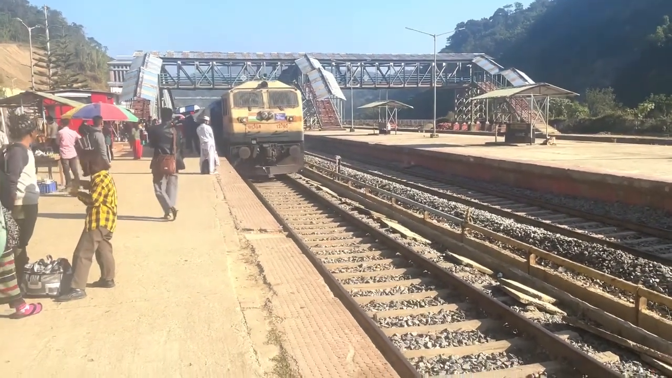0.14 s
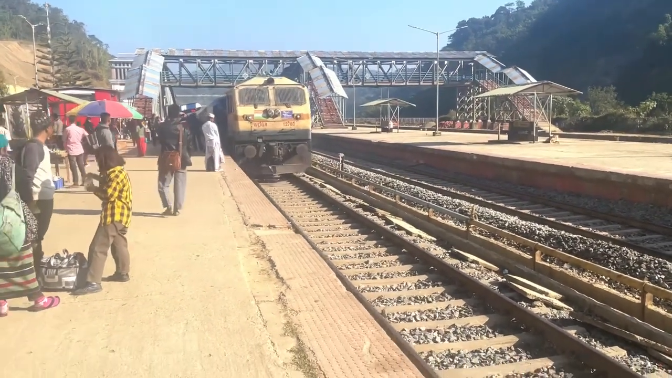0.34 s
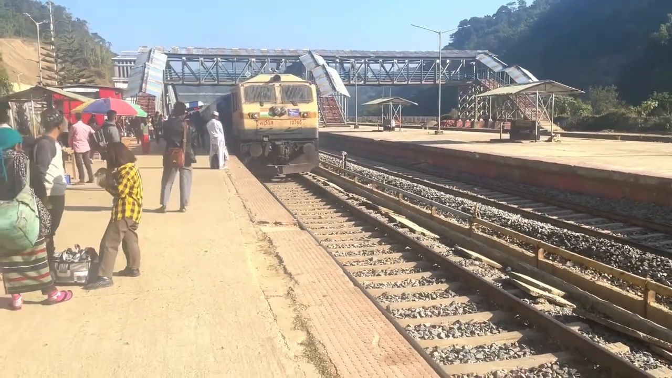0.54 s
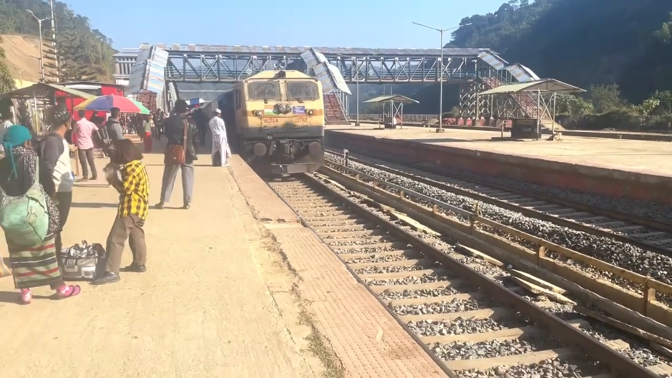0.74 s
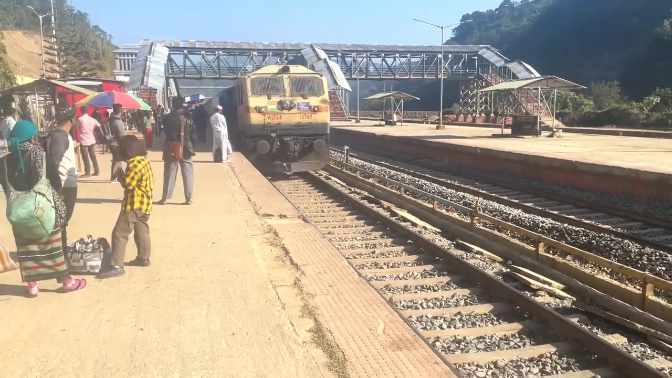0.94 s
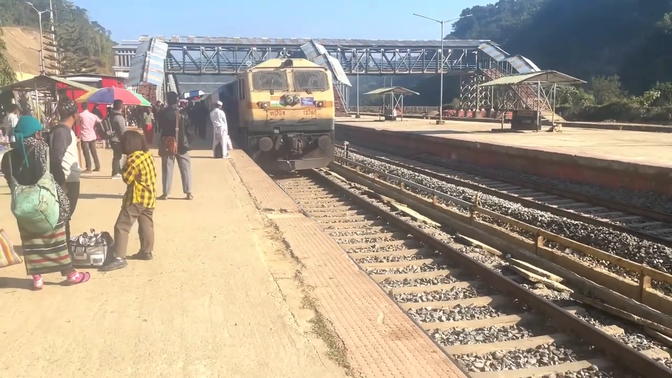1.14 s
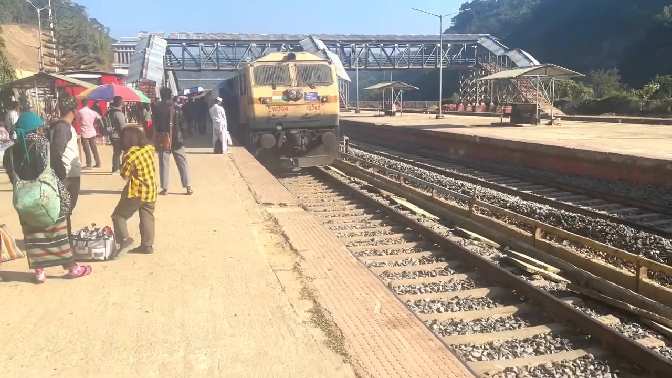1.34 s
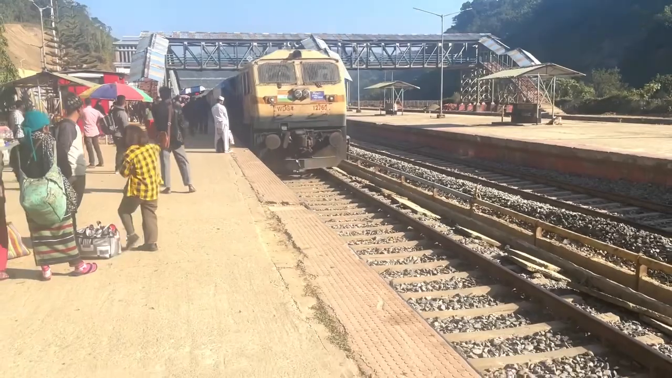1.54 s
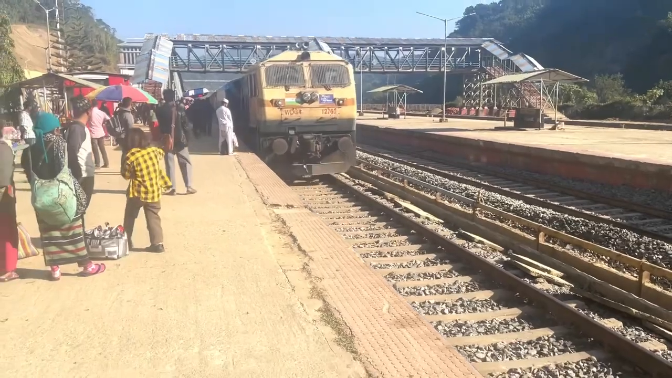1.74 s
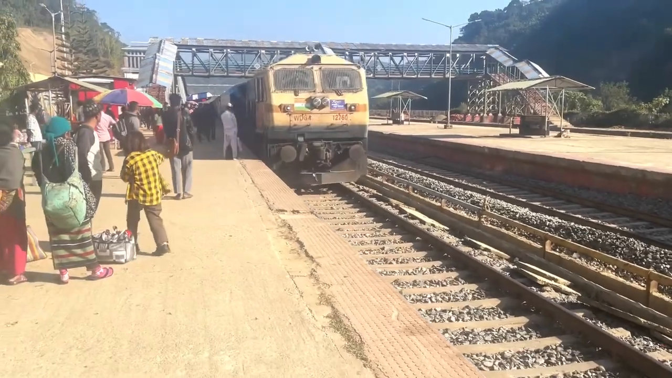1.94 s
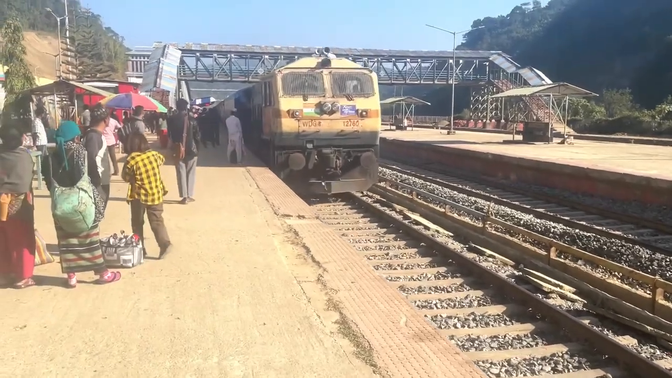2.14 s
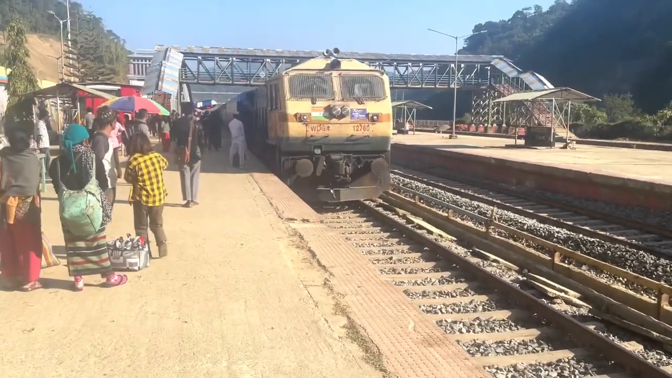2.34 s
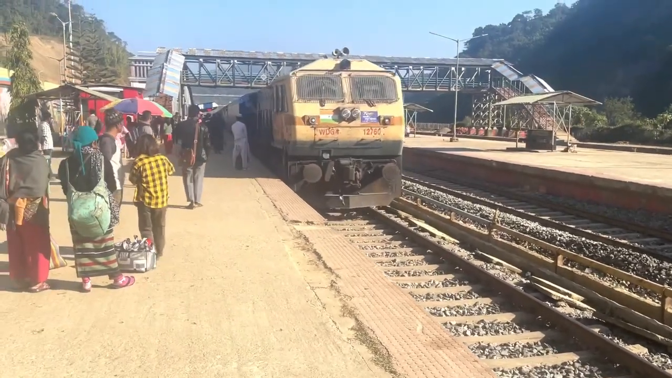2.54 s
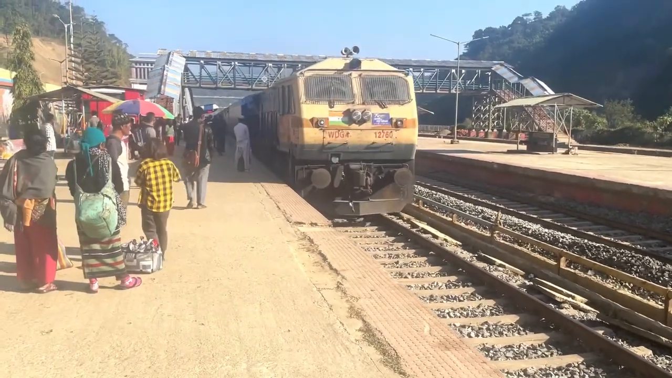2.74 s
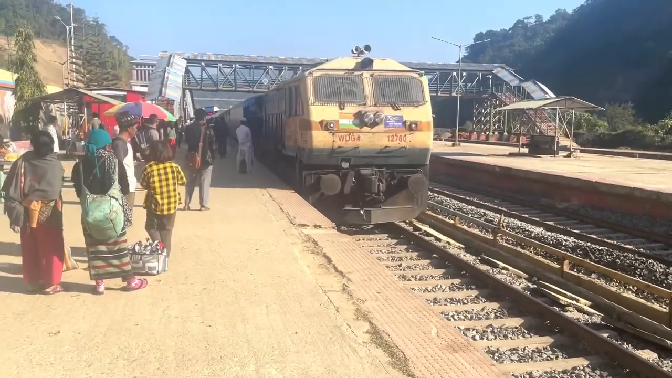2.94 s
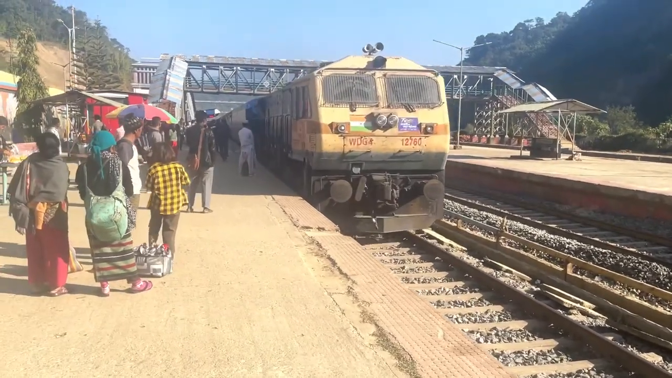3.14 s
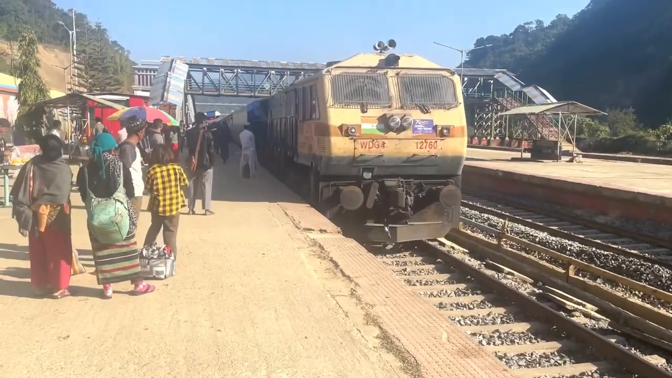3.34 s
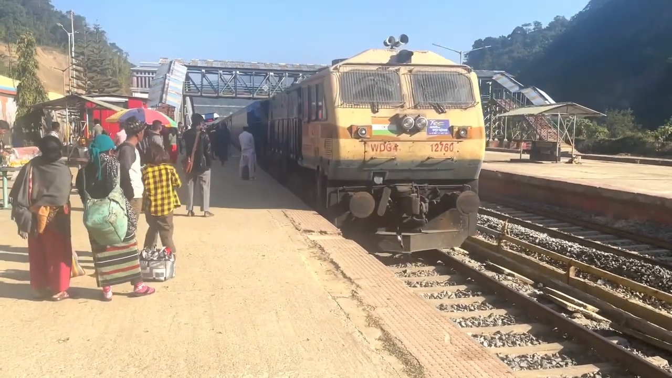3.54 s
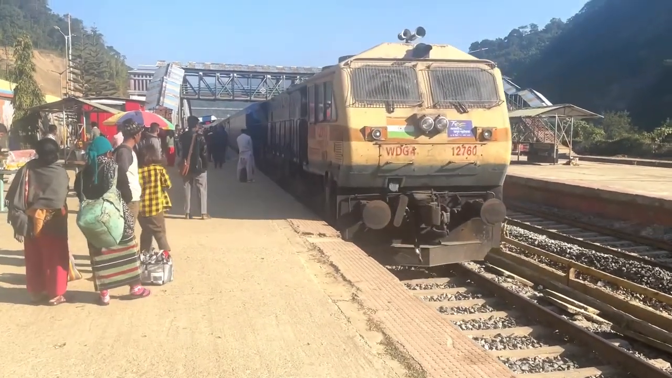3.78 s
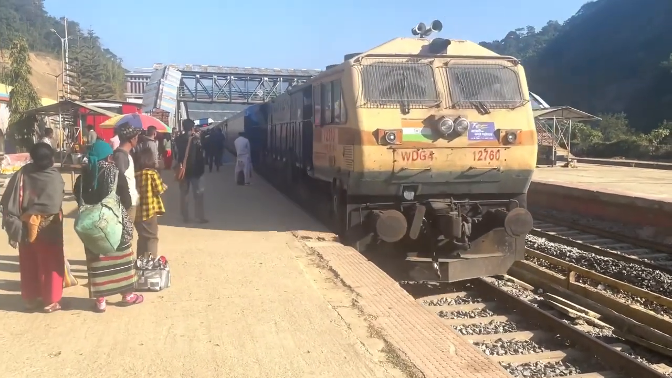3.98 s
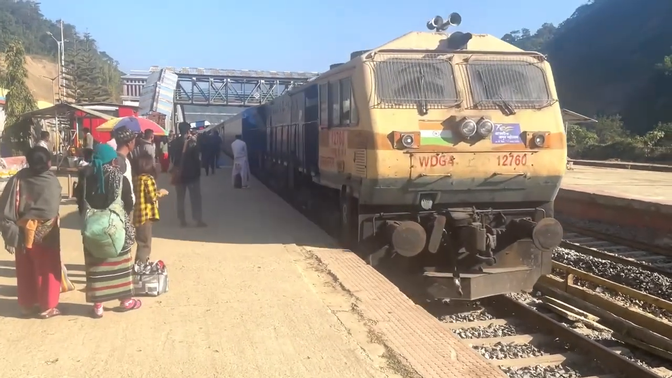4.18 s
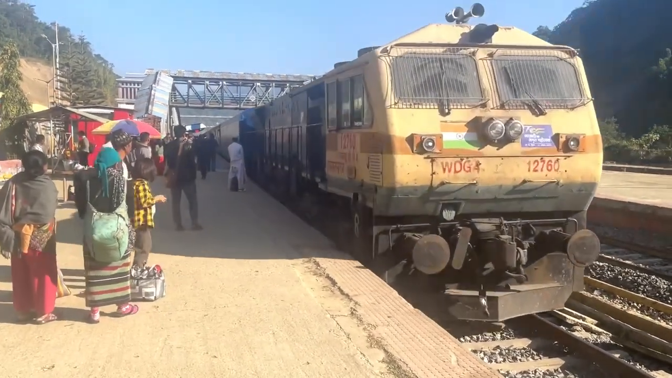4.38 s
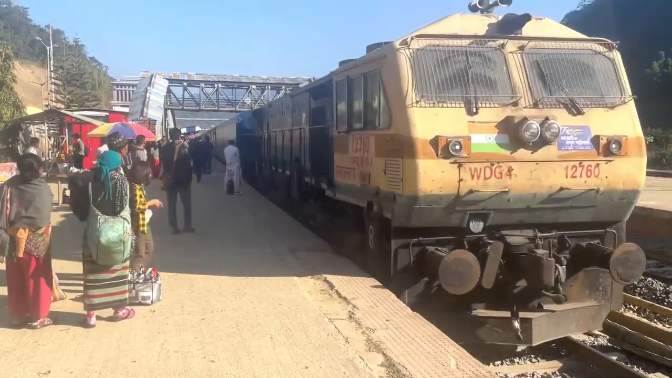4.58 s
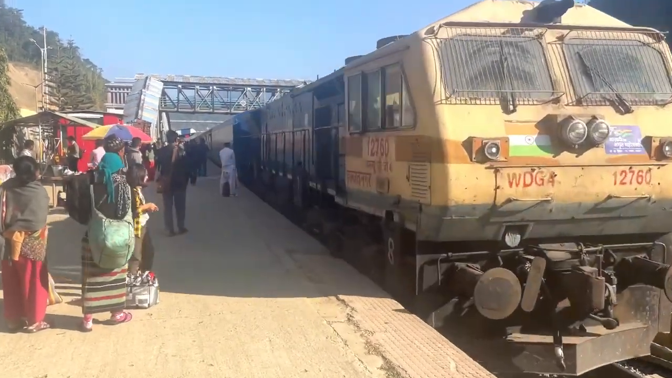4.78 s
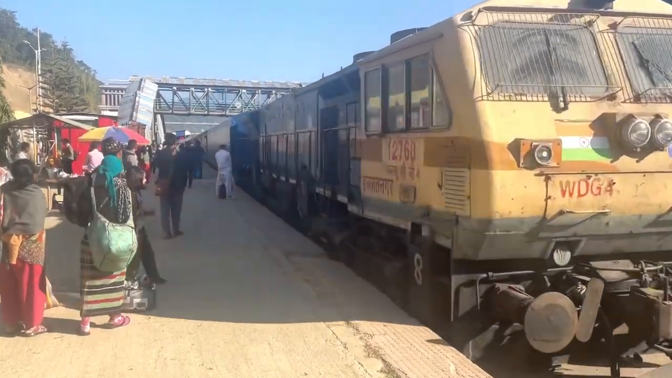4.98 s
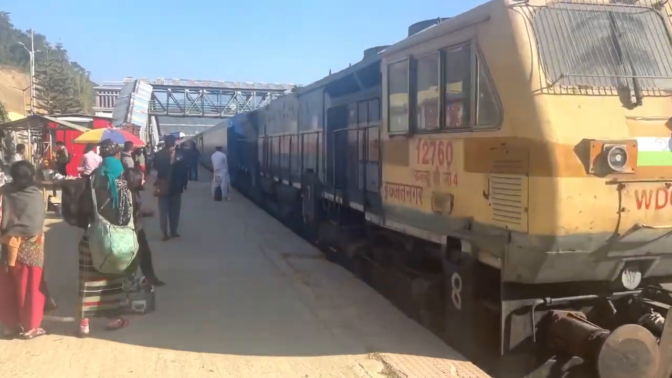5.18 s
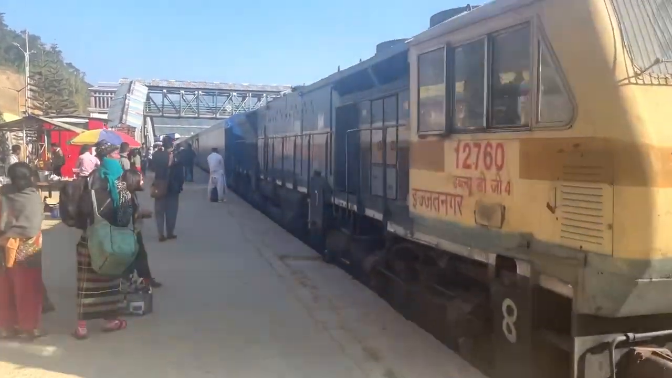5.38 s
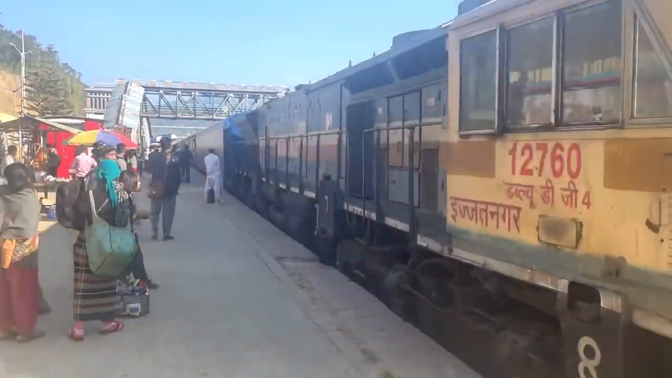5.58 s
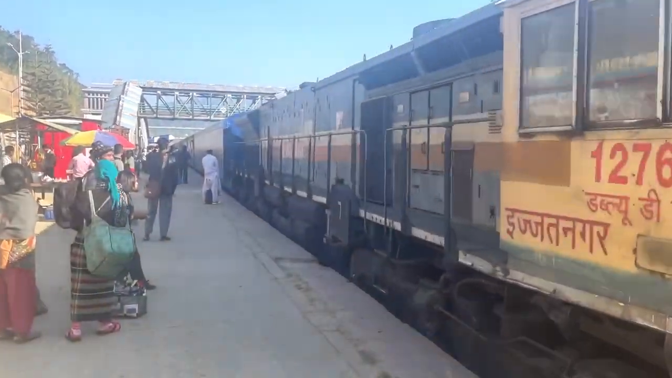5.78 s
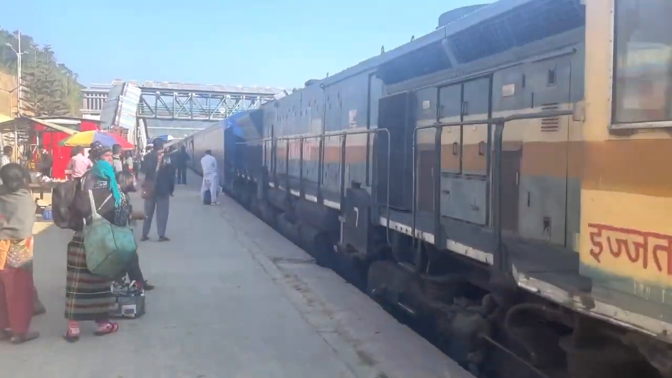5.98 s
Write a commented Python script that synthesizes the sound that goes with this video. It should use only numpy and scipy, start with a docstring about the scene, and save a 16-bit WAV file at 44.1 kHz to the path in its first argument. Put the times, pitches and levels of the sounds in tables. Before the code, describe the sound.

A diesel locomotive rolls toward a listener on an open station platform. Its engine throbs low and steady while a rough roar of fans and wheels grows gradually louder. A thin, high turbine whine flickers above it, joined by a faint squeal. About two thirds through, a wheel gives one soft, dull knock with a tiny puff of air. The engine is loudest at the end, as it draws almost level.

```python
"""Diesel locomotive along a platform

A phone on the platform, 5 m from the track, hears a sixteen-cylinder two-stroke roll up from some 30 m.
Exhaust orders of the crankshaft throb in the bass; gears, blower and turbine whine in thin lines that
fade in the moving air. Fans, wheels and ballast roar louder as it nears; a wheel knocks, brake air puffs."""
import sys
import numpy as np
from scipy import signal
from scipy.fft import rfft, irfft
from scipy.io import wavfile
from scipy.ndimage import uniform_filter1d, map_coordinates

SR = 44100
rng = np.random.default_rng(int(sys.argv[2]) if len(sys.argv) > 2 else 0)


def wav_out(sig):
    """Save sig, one row per channel (or a flat mono array), as 16-bit PCM at SR to the path in sys.argv[1]."""
    wavfile.write(sys.argv[1], SR, np.round(np.clip(np.atleast_2d(sig).T, -1, 1) * 32767).astype(np.int16))


N = 265041
T = np.arange(N) / SR
CRANK_HZ = 6.083
FIRING_HZ = 8 * CRANK_HZ  # one bank of eight cylinders


def exhaust():
    """Orders of the crank turn beat against each other; each main one sinks where an echo cancels it."""
    # main tones (crank order, index of the part that sounds it)
    main_orders = ((8, 0), (9, 0), (11, 2), (13, 1), (15, 1), (16, 2), (17, 1))
    # starting crank angle of each part (first manifold [deg], second manifold [deg], outlet [deg])
    stack_deg = (16., 241., 0.)
    # per main tone (base level [dB], drift [dB/s], dip time [s], half width [s], depth [dB])
    echo_dips = [(-16, 0.76, 5.12, 0.7, -30), (-23, -0.85, 4.8, 0.69, -17), (-43.5, 1.5, 1.3, 1.9, -14.5),
                 (-36, 2.5, 1.1, 1.7, -17), (-19.5, 1.5, 3.3, 0.48, -3), (-24.5, 0.93, 2.65, 1.3, -13),
                 (-20, 1.09, 2.45, 1.03, -9.5)]
    # per main tone (phase gained through its dip [deg])
    echo_turn_deg = (145, 130, 0, 90, 0, 0, 0)
    # brief swells and sags, by order (time [s], half width [s], gain [dB])
    bulges = {13: (2.8, 0.31, 3.2), 15: (1.36, 0.3, 2), 16: (4.1, .3, 2.8), 17: (5.3, 0.47, -1.8)}
    # weak tones of block and manifold (crank order, base level [dB])
    weak_orders = [(7, -38.5), (10, -36), (12, -35), (18, -41.5), (21, -40.5), (23, -41.5), (24, -35),
                   (30, -37), (32, -39), (35, -38), (40, -43), (42, -47)]
    flat_hz, drift_ends_s = .11, 4.86
    # the governor lets the crank run ahead and fall back
    hunt = np.radians(2.3) * (.4 + np.sin(2 * np.pi * (T - 2.2) / 4.8))
    crank = 2 * np.pi * CRANK_HZ * T + hunt
    out = 0
    for (k, stack), (db, drift, s, width, depth_db), turn in zip(main_orders, echo_dips, echo_turn_deg):
        passed = .5 + np.arctan((T - s) / (width * undb(depth_db))) / np.pi
        phase = k * (crank + np.radians(stack_deg[stack])) - 2 * np.pi * flat_hz * T
        phase += np.radians(turn) * passed
        level_db = db + drift * np.minimum(T, drift_ends_s) + echo_dip_db(s, width, depth_db)
        if k > 10:
            level_db -= 1.5 * np.maximum(T - drift_ends_s, 0)
        at, half, bulge_db = bulges.get(k, (0, 1, 0))
        level_db += bulge_db * np.exp(-((T - at) / half) ** 2)
        out += tone(phase, level_db, lead=.05, spread=.004 * (k - 5), flutter_db=.3, pan_db=.9, fading=0)
    for k, db in weak_orders:
        level_db = db + .22 * nearness_db() - .74 + 1.7 * walk(1.1)
        phase = k * crank + 2 * np.pi * rng.random() + .71 * walk(1.61)
        out += tone(phase, level_db, lead=.099, spread=.085, flutter_db=.5, pan_db=4.5)
    return out


def echo_dip_db(s, width, depth_db):
    """The notch in level that a cancelling echo cuts around time s."""
    away = ((T - s) / width) ** 2
    return 10 * np.log10((away + undb(depth_db) ** 2) / (away + 1))


def roar():
    """Fans, wheels and ballast: noise bands flicker and swell with nearness, the treble most."""
    # spectrum common to both microphones (frequency [Hz], relative density [dB])
    mid_spectrum = [(20, -4.5), (40, -6.5), (75, 5), (125, 0.5), (250, -3), (700, -7), (900, -13),
                    (1600, -20.5), (2700, -22), (3300, -30.5), (3800, -30), (4900, -29), (5800, -32.5),
                    (7300, -38), (7700, -53.5), (8300, -92.5), (9600, -47.5), (10200, -46.5), (12500, -50),
                    (13500, -69), (14200, -95.5)]
    # spectrum in opposite phase at the two (frequency [Hz], relative density [dB])
    side_spectrum = [(20, -12), (130, -12), (250, -10), (450, -5.5), (720, -4.5), (1100, -9.5), (2700, -13),
                     (4400, -22.5), (6500, -26.5), (9000, -31), (10200, -40.5), (11500, -67),
                     (13500, -42.5), (15000, -42.5), (15800, -68)]
    # casing resonances (frequency [Hz], width [Hz], relative level [dB])
    casing = [(340.4, 17, -12.5), (477.7, 18, -12.5), (581.8, 8, -18), (718, 120, -7.5), (2854, 800, -11.5),
              (3417, 83, -12), (4360, 190, -26.5), (5310, 87, -20), (10660, 350, -35)]
    # extra swell of the top treble (time [s], gain [dB])
    treble = [(0, 1), (.7, 2.5), (1.1, -3.5), (1.6, -2), (2.2, 0), (2.6, 1), (3.0, -1), (3.2, -1.5),
              (3.7, -1), (3.95, 0), (4.5, 1.5), (5.0, 0), (6, -1)]
    # stereo balance (frequency [Hz], left minus right [dB])
    balance = [(50, -7.5), (250, -0.5), (600, 4.5), (1200, 3), (2400, -3), (5000, 4.5), (10000, 0)]
    near_db = nearness_db()
    rumble_db = -33 + .98 * near_db
    tilt_db = .14 * (near_db - np.mean(near_db))
    ahead = np.clip((5 - T) / 2.5, 0, 1)  # falls to 0 as the engine swings aside

    def gain(hz):
        hiss_share = np.clip(np.log2(hz / 700) / .88, 0, 1)
        treble_share = np.clip(np.log2(hz / 1500) / 2.2, 0, 1)
        flicker_db = (.4 + .5 * hiss_share) * walk(15)
        return undb(rumble_db + hiss_share * tilt_db + treble_share * curve(treble) + flicker_db)
    bands = [(hz, undb(1.5) * x) for hz, x in third_octaves(mid_spectrum)]
    bands += [(hz, undb(db + 1.26 * walk(6)) * resonance(hz, width)) for hz, width, db in casing]
    balance_hz, balance_db = np.transpose(balance)
    left = right_low = right_high = 0
    for hz, x in bands:
        x = x * gain(hz)
        lean = undb(np.interp(np.log(hz), np.log(balance_hz), balance_db) / 2)
        left += x * lean
        if hz > 1200:
            right_high += x / lean
        else:
            right_low += x / lean
    # long waves reach the left microphone first while the engine is ahead
    lag_s = .00014 * ahead
    right = right_high + map_coordinates(right_low, [np.arange(N) - lag_s * SR], order=3, mode="mirror")
    side = undb(-15 + 4 * ahead) * sum(x * gain(hz) for hz, x in third_octaves(side_spectrum))
    return np.array([left + side, right - side])


def turbine(hz=3446.5):
    """The turbine's whine grows with nearness, wavers in stirred air and flares now and then."""
    # flares (time [s], peak level [dB], half width [s])
    flares = [(0.042, -35, 0.058), (0.265, -35.5, 0.078), (0.503, -45, .06), (0.72, -37.5, 0.21),
              (1.036, -25, 0.039), (1.2, -32, 0.11), (1.48, -30, 0.051), (1.64, -36.5, 0.043),
              (1.897, -30.5, 0.031), (2.024, -30.5, 0.033), (2.196, -36, 0.052), (2.397, -27, 0.038),
              (2.554, -28.5, 0.028), (2.679, -28.5, 0.02), (2.766, -34, .03), (2.876, -26.5, 0.027),
              (3.076, -33.5, 0.03), (3.184, -30, 0.021), (3.347, -32.5, 0.1), (3.634, -26, 0.054),
              (3.789, -21, 0.015), (3.95, -31, 0.11), (4.116, -29.5, 0.071), (4.328, -22, 0.057),
              (4.496, -22, 0.019), (4.68, -30, 0.21), (4.885, -21, 0.046), (5.05, -22, 0.078),
              (5.227, -26, 0.057), (5.37, -27, 0.06), (5.5, -25, 0.088), (5.737, -23, 0.06),
              (5.846, -20, 0.058), (6.0, -23, 0.015)]
    # weaker lines at 0.5, 1.5 and 2 times the pitch, each (time [s], level [dB])
    partials = [
        [(0, -71), (3.3, -60), (3.8, -52), (4.5, -42), (5, -46), (5.7, -40.5), (6, -51)],
        [(0, -65), (1.35, -66), (1.52, -53), (1.7, -59), (2.1, -52), (2.4, -53.5), (4.2, -54), (4.75, -45.5),
         (4.92, -49), (5.15, -39.5), (5.4, -48), (5.6, -47), (6, -43)],
        [(0, -67.5), (1.1, -68), (3, -66), (4.5, -58.5), (5.1, -57.5), (6, -50)],
    ]
    # lead of the left microphone (time [s], phase [rad])
    lead = ((0, 1.82), (3.8, 1.77), (6, 0.81))
    power = undb(-48.5 + nearness_db() + 4.5 * walk(24)) ** 2
    power += sum(undb(db) ** 2 * np.exp(-((T - s) / half) ** 2) for s, db, half in flares)
    phase = shaft_phase(hz, shake_rad=undb(-14))
    out = tone(phase + .15 * walk(25), 10 * np.log10(power), lead=curve(lead),
               spread=.25, flutter_db=.9, pan_db=1.5, fading=.2)
    for k, levels in zip((.5, 1.5, 2), partials):
        out += tone(k * phase + .9 * walk(40), curve(levels), lead=.4, spread=.6, flutter_db=1.6, fading=.5)
    return out


def gears(hz=2941):
    """The gear whine swells and drops out, right of centre."""
    # swells (time [s], level [dB])
    levels = [(0, -52), (.62, -40), (1.08, -48), (1.3, -35), (1.75, -55), (1.9, -38.5), (2.2, -44.5),
              (2.5, -34.5), (2.6, -50), (2.72, -35), (2.9, -45.5), (3.05, -36), (3.3, -48), (3.68, -31.5),
              (3.86, -37), (4.1, -31), (4.3, -45), (4.52, -29.5), (4.64, -49), (4.83, -38), (5.27, -31.5),
              (5.37, -48), (5.78, -32.5), (6, -41)]
    # lead of the left microphone (time [s], phase [rad])
    lead = ((0, 0.48), (6, 1.1))
    phase = shaft_phase(hz, shake_rad=undb(-10.5)) + .15 * walk(25)
    return tone(phase, curve(levels), lead=curve(lead), spread=.084, flutter_db=.9, pan_db=-5.5, fading=.2)


def shaft_phase(hz, shake_rad):
    """Phase of a fast shaft tone; the firing of each bank shakes sidebands onto it."""
    shake = shake_rad * np.sin(2 * np.pi * FIRING_HZ * T + .5 * walk(7.3))
    return 2 * np.pi * np.cumsum(hz + 1.8 * walk(4)) / SR + shake


def alternator(slot_hz=479.6):
    """The alternator's slots hum at a steady pitch."""
    # 2nd, 3rd and 4th multiples of the slot tone, each (time [s], level [dB])
    hums = [
        [(0.0, -67), (0.08, -46), (0.47, -49.5), (2.62, -38.5), (2.66, -46.5), (3.27, -48), (4.11, -35.5),
         (4.34, -56), (4.46, -37), (5.13, -49), (5.21, -36), (6.0, -39)],
        [(0.0, -53), (0.17, -54), (0.82, -50), (0.84, -64), (1.19, -42.5), (1.27, -56.5), (2.49, -50),
         (3.44, -49.5), (5.56, -43), (5.58, -33.5), (5.98, -30.5), (6.0, -35)],
        [(0.0, -70), (0.22, -46), (0.28, -61), (2.59, -58.5), (2.69, -41), (2.81, -47), (3.66, -58.5),
         (5.9, -41), (6.0, -43.5)],
    ]
    out = 0
    for i, levels in enumerate(hums):
        phase = (i + 2) * 2 * np.pi * slot_hz * T + .86 * walk(12)
        out += tone(phase, curve(levels), spread=.29 + .5 * i, flutter_db=.9, pan_db=1.6, fading=.4)
    return out


def blower_and_squeals(blade_hz=1339.5, squeal_hz=5355.5, faint_hz=5895):
    """The blower's blade tone and two thin squeals, the stronger shaken at the firing rate."""
    # blade tone and stronger squeal, each (time [s], level [dB])
    levels = [
        [(0, -52.5), (1.4, -58), (2.66, -52), (4.3, -49), (4.6, -43.5), (5, -45.5), (5.5, -42.5), (6, -37)],
        [(0, -51), (.55, -53), (1.4, -53.5), (2.0, -52), (2.5, -48.5), (3.0, -39.5), (3.15, -46), (3.35, -44),
         (3.5, -43), (3.65, -36), (3.8, -39), (3.95, -43), (4.1, -42), (4.45, -38), (4.8, -47.5), (5.3, -40.5),
         (6, -43.5)],
    ]
    blade_db, squeal_db = map(curve, levels)
    shake = .9 * np.sin(2 * np.pi * FIRING_HZ * T + walk(4.8))
    out = tone(2 * np.pi * blade_hz * T + .7 * walk(9.9), blade_db, spread=.97, flutter_db=1.7, fading=.5)
    out += tone(2 * np.pi * faint_hz * T + walk(30), -74 + nearness_db(), fading=.5)
    squeal_phase = 2 * np.pi * squeal_hz * T + shake + .64 * walk(60)
    return out + tone(squeal_phase, squeal_db, lead=.5, spread=.5, flutter_db=1.2, pan_db=1.5, fading=.4)


def wheel_knock(attack_s=.013):
    """A wheel strikes a dull blow into the modes of a rail joint."""
    # blows (time [s], gain [dB])
    knocks = [(3.905, -11)]
    # joint modes (frequency [Hz], relative level [dB], time to fall 60 dB [s])
    modes = [(343, 2.5, 0.14), (392, -3, 0.19), (563, -8, 0.17), (1004, -12, 0.19)]
    out = 0
    for s, db in knocks:
        age = np.maximum(T - s, 0)
        ring = sum(undb(mode_db - 60 * age / t60) * np.sin(2 * np.pi * hz * age) for hz, mode_db, t60 in modes)
        out += undb(db) * ring * np.minimum(age / attack_s, 1)
    return out


def brake_air(attack_s=.027):
    """Brake air escapes in a thin, high puff."""
    # puffs (time [s], gain [dB], decay time [s])
    puffs = [(3.96, -37, 0.035)]
    envelope = 0
    for s, db, decay_s in puffs:
        age = np.maximum(T - s, 0)
        envelope += undb(db) * np.exp(-age / decay_s) * np.minimum(age / attack_s, 1)
    hiss_band = signal.butter(4, (9500, 12800), "band", fs=SR, output="sos")
    return envelope * signal.sosfilt(hiss_band, rng.standard_normal(N))


def nearness_db(speed_m_s=4.25, abreast_s=7.38, track_m=5):
    """Gain since the start as the engine closes on the microphone at a steady speed."""
    metres = np.hypot(speed_m_s * (T - abreast_s), track_m)
    return 20 * np.log10(metres[0] / metres)


def tone(phase, db, lead=.24, spread=.64, flutter_db=1, pan_db=-7, fading=.073):
    """A tone at two microphones: stirred air shifts phase and level; a wandering second path fades it."""
    apart = lead + spread * walk(3)  # radians by which the left leads
    paths = 1 + fading * np.exp(3j * walk(16))
    channels = []
    for side in (1, -1):
        wave = np.real(paths * np.exp(1j * (phase + side * apart / 2)))
        channels.append(wave * undb(flutter_db * walk(15) + side * pan_db / 2))
    return np.sqrt(2) * undb(db) * np.array(channels)


def clatter_spectrum(turn_s=.16472, likeness=.8):
    """Noise of which a share repeats, as the block clatters alike on every crank turn."""
    # repeating part (frequency [Hz], share of the power)
    repeats = ((130, .3), (300, .55), (850, .6), (1100, .15), (2500, .08), (3500, 0))
    f = np.fft.rfftfreq(N, 1 / SR)
    comb = (1 - likeness ** 2) / np.abs(1 - likeness * np.exp(-2j * np.pi * f * turn_s)) ** 2
    share = np.interp(f, *np.transpose(repeats))
    return rfft(rng.standard_normal(N)) * np.sqrt(1 - share + share * comb)


def third_octaves(points):
    """(centre, band) pairs of clatter shaped by (Hz, dB) points; unit rms from 120 to 900 Hz."""
    f = np.fft.rfftfreq(N, 1 / SR) + 1
    hz, db = np.transpose(points)
    spectrum = clatter_spectrum() * undb(np.interp(np.log(f), np.log(hz), db))
    spectrum /= np.sqrt(np.sum(np.abs(spectrum[(f > 120) & (f < 900)]) ** 2) * 2) / N
    for centre in 25 * 2 ** np.arange(0, 9.6, 1 / 3):
        yield centre, irfft(spectrum * np.clip(1 - np.abs(3 * np.log2(f / centre)), 0, 1), N)


def resonance(hz, width_hz):
    """Clatter in a bell-shaped band, at unit rms."""
    f = np.fft.rfftfreq(N, 1 / SR)
    x = irfft(clatter_spectrum() / (1 + (2 * (f - hz) / width_hz) ** 2), N)
    return x / np.std(x)


def walk(rate):
    """Random levels held 1 / rate s and smoothed twice; spread near 1."""
    hold = int(SR / rate)
    steps = np.repeat(rng.standard_normal(N // hold + 1), hold)
    return 1.44 * uniform_filter1d(uniform_filter1d(steps, hold), hold)[:N]


def curve(table):
    """Straight lines in time through (s, value) points."""
    return np.interp(T, *np.transpose(table))


def undb(db):
    """Decibels to gain."""
    return 10 ** (np.asarray(db) / 20)


def scene():
    """The approaching locomotive in stereo, from the platform."""
    whines = turbine() + gears()
    return exhaust() + whines + alternator() + blower_and_squeals() + roar() + wheel_knock() + brake_air()


def record(dry):
    """The phone rounds the loudest peaks and cuts the top."""
    top_cut = signal.ellip(8, .2, 70, 15800, fs=SR, output="sos")
    return signal.sosfilt(top_cut, np.tanh(.8 * dry) / .8)


dry = scene()
out = record(dry)
wav_out(out)
```